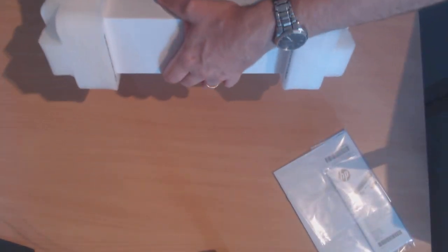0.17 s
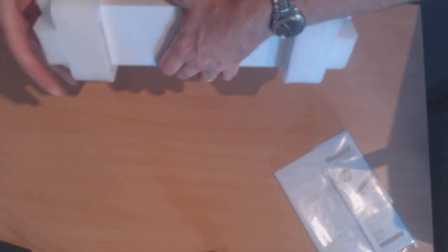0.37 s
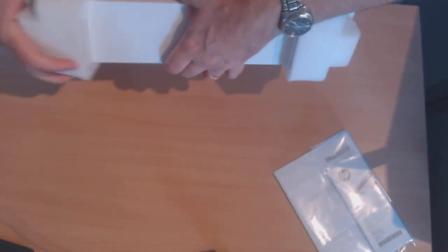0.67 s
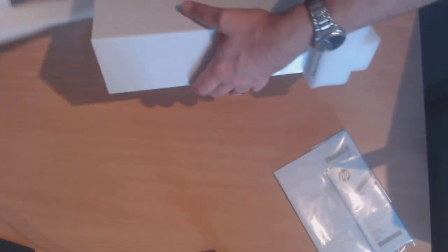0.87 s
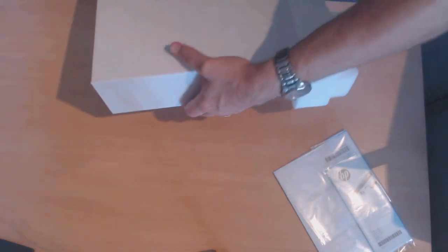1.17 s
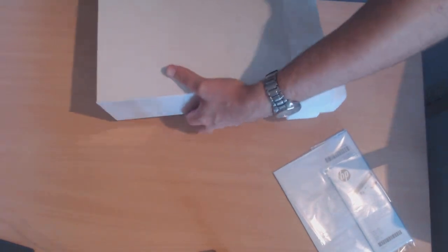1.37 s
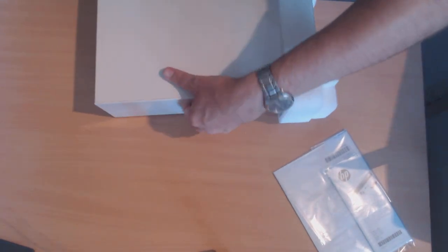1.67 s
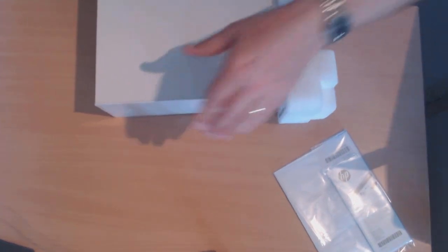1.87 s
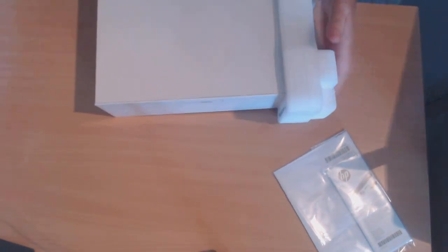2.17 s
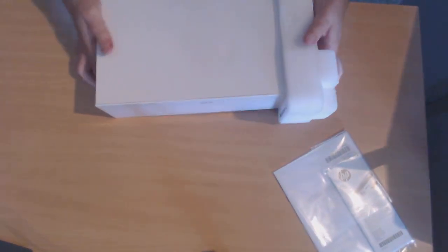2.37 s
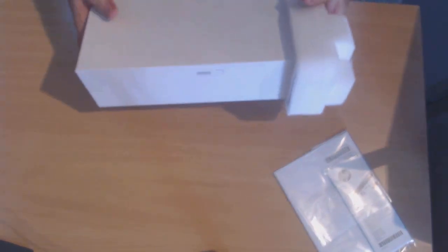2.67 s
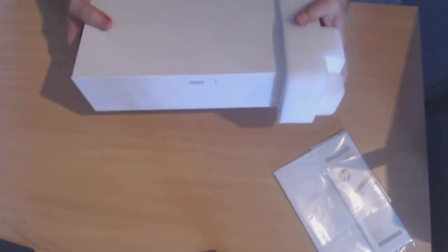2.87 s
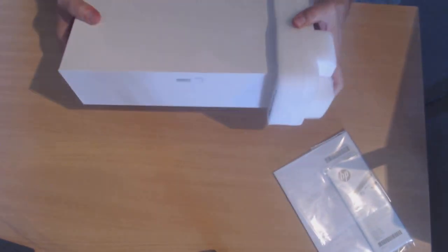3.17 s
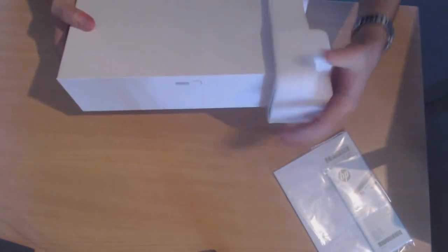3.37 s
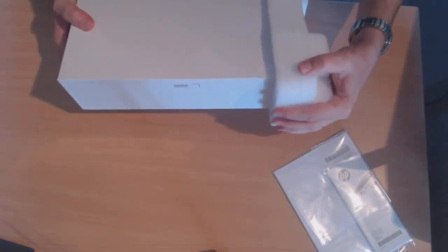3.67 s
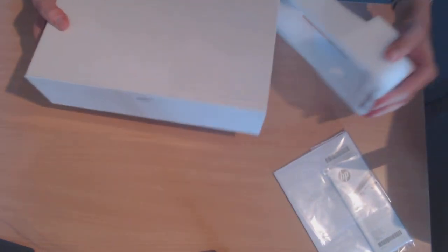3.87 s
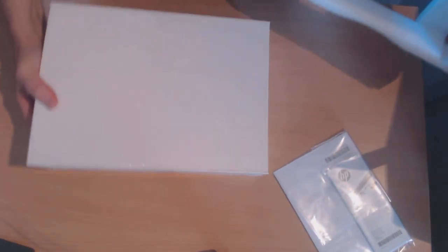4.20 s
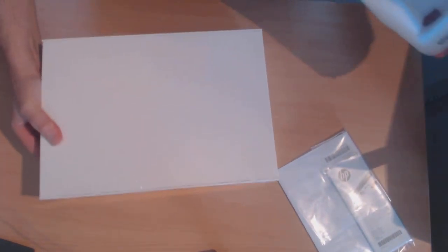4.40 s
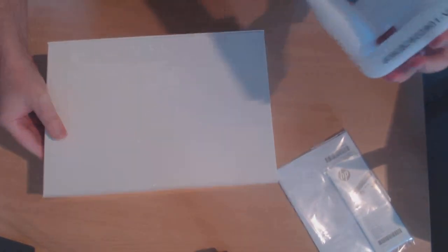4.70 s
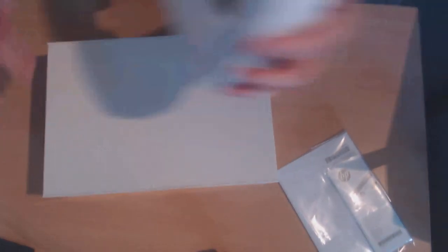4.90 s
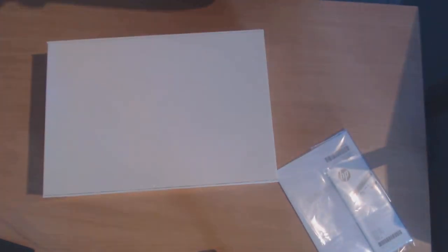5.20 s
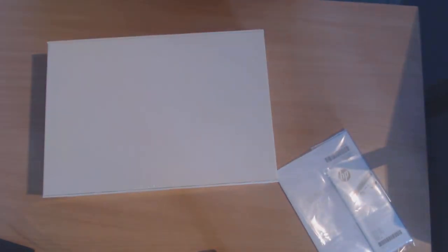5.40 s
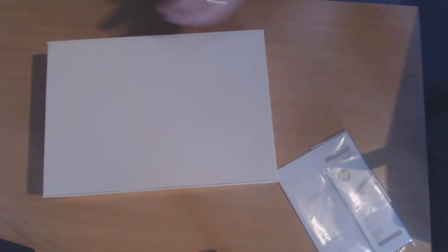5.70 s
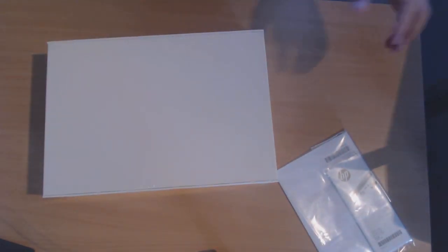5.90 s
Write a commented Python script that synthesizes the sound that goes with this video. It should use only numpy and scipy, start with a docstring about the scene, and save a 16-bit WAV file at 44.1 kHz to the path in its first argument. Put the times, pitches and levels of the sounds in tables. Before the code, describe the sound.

Foam end caps scrape and squeak off a cardboard box on a wooden desk, with hollow knocks as it tips and lands flat.

```python
"""Foam scrapes, ticks and squeaks on board as end caps are pulled off a cardboard box on a wooden desk.
The box is bumped, tipped over and laid flat, and a cap is knocked down, close to a small microphone in a small room.
Scrapes are dense random slips shaped by pressure, squeaks are short wavering tones, ticks are noise snaps,
and knocks mix a panel tone, a crack, box modes and a noise wash. A faint hum and room noise lie underneath."""
import sys
import numpy as np
from scipy import signal
from scipy.fft import rfft, irfft, next_fast_len
from scipy.io import wavfile

SR = 44100
rng = np.random.default_rng(int(sys.argv[2]) if len(sys.argv) > 2 else 0)


def master(y):
    """Save y as 16-bit WAV."""
    cut = np.clip(np.atleast_2d(y).T, -1, 1)
    pcm = np.round(cut * 32767)  # scale
    wavfile.write(sys.argv[1], SR, pcm.astype(np.int16))


N = 266805
TIME = np.arange(N) / SR

# Spectra of foam hiss, foam rasp and board rustle. Each row: frequency in Hz, relative density in dB.
HISS_SPECTRUM = [(1800, -26), (3000, -6.5), (4000, 2), (4800, 4), (6000, 0), (7000, -7.5), (8000, -16)]
RASP_SPECTRUM = [(900, -23), (1500, -7.5), (1900, 1.5), (2600, 0), (3300, -0.5), (4200, -10.5), (6500, -30)]
RUSTLE_SPECTRUM = [(150, -28), (350, -13.5), (550, -5), (800, -3), (1100, 3.5), (1500, 1.5), (2200, -12.5),
                   (4000, -43)]


def from_db(db):
    """Turn decibels into an amplitude factor."""
    return 10 ** (np.asarray(db) / 20)


def rms_one(x):
    """Scale a signal to rms 1."""
    return x / np.sqrt(np.mean(x ** 2) + 1e-20)


def cut(x, hz, kind, order=2):
    """Butterworth filter: low, high or band."""
    return signal.sosfilt(signal.butter(order, hz, kind, fs=SR, output="sos"), x + 1e-18)


def colour(x, spectrum):
    """Give a noise a spectrum, interpolated over log frequency; rms 1."""
    length = x.shape[-1]
    hz, db = np.transpose(spectrum)
    size = next_fast_len(length)
    log_hz = np.log(np.fft.rfftfreq(size, 1 / SR) + 1)
    gain = from_db(np.interp(log_hz, np.log(hz), db))
    return rms_one(irfft(rfft(x, size) * gain, size)[..., :length])


def fade(t, t60):
    """Exponential decay that falls 60 dB in t60 seconds."""
    return np.exp(-np.log(1000) * t / t60)


def add(out, s, sound):
    """Mix a sound in at a time in seconds."""
    start = max(round(s * SR), 0)
    out[start:start + len(sound)] += sound[:N - start]


def drift(hz):
    """Slow random wander below hz, with spread 1."""
    step = 20   # samples between the points of the wander
    slow = cut(rng.standard_normal(N // step + 2), hz * step, "low")
    return rms_one(np.interp(np.arange(N) / step, np.arange(len(slow)), slow))


def pressure(start, attack_s, hold_s, attack_curve=2.1, release_t60_s=0.18):
    """One stroke: the foam starts to slide, holds its speed, then the sound dies away."""
    t = TIME - start
    attack = np.clip(t / attack_s, 0, 1) ** attack_curve
    return attack * fade(np.maximum(t - attack_s - hold_s, 0), release_t60_s)


def friction(spectrum, grains_per_s, grain_db, judder_db, patchy_db=3.5):
    """Countless tiny slips of uneven size, bunched by the juddering of the hand; rms 1.
    As the contact travels over the board, different resonances swell and fade."""
    band_edges_hz = np.geomspace(200, 9000, 13)
    sizes = from_db(grain_db * np.minimum(rng.exponential(1, N), 5)) * rng.standard_normal((2, N))
    slipping = rng.random(N) < grains_per_s / SR
    slips = sizes * slipping * from_db(judder_db * drift(hz=69.5))
    patches = np.zeros(N)
    for k, edges in enumerate(zip(band_edges_hz, band_edges_hz[1:])):
        # neighbouring bands take their slips from different streams
        patches += cut(slips[k % 2], edges, "band") * from_db(patchy_db * drift(hz=14))
    return colour(patches, spectrum)


def scraping(rasp_db=0.2, hiss_db=-1.13, rustle_db=-1.1):
    """Foam beads hiss and rasp as they slide and the board under them rustles, all driven by the same pressure."""
    # Foam and hands sliding on the board. Each row: start in seconds, attack in seconds, hold in seconds,
    # level in dB, hiss over rasp in dB, rustle over rasp in dB; the balance above is added to the levels.
    strokes = [(0.0, 0.0033, 0.046, -48, -3.5, -2), (0.029, 0.036, 0.12, -52, -11, -10),
               (0.245, 0.021, 0.057, -59.5, -24, -18), (0.479, 0.052, 0.044, -35.5, -2, -3),
               (0.684, 0.026, 0.014, -38, 1, 1.5), (0.763, 0.028, 0.012, -47.5, -0.5, -9),
               (0.808, 0.068, 0.068, -46.5, 6.5, 1.5), (0.882, 0.082, 0.075, -37.5, 0, 4),
               (0.964, 0.019, 0.014, -44.5, -6, 13.5), (1.028, .03, 0.06, -49, 2, 7.5),
               (1.095, 0.071, 0.034, -47.5, -3.5, 4.5), (1.16, 0.024, 0.013, -45.5, 1, 7),
               (1.225, 0.0094, 0.015, -49.5, -2, 0), (1.34, .012, 0.045, -42.5, -10, -6),
               (1.823, 0.024, 0.0096, -52, 2.5, -2), (1.931, 0.036, 0.026, -57, -8.5, 11),
               (2.272, 0.017, 0.014, -78.5, 9.5, -10), (2.449, 0.019, 0.026, -45.5, -1, -1.5),
               (2.524, 0.039, 0.11, -59.5, -4, -8), (2.697, .02, 0.018, -54, -0.5, -20.5),
               (2.746, 0.017, 0.16, -51.5, -7, -11), (2.818, 0.01, 0.0034, -48, -1, -18),
               (2.965, 0.033, 0.059, -56, -7.5, -13), (3.085, 0.037, 0.015, -48, -16, -7.5),
               (3.155, 0.018, 0.0043, -54.5, -4.5, -9.5), (3.28, 0.067, 0.024, -58.5, 1.5, -13),
               (3.467, 0.037, 0.03, -33.5, -0.5, -4.5), (3.677, 0.016, 0.0044, -39.5, -3, 5),
               (3.75, 0.0064, 0.0046, -51, -7, -6.5), (3.86, 0.079, 0.029, -40, 2, -13),
               (3.914, 0.073, 0.026, -37.5, 1.5, 2), (3.992, .018, .008, -38.5, -2.5, 8),
               (4.038, 0.032, .11, -46.5, -4, 2), (4.166, 0.046, 0.054, -49, -4, -9),
               (4.713, 0.041, 0.072, -64, 2.5, -8), (4.847, 0.014, 0.0091, -55.5, 3.5, -14.5),
               (4.926, 0.041, .03, -71.5, -9.5, 9.5), (5.284, 0.011, 0.037, -44.5, 1, 3.5),
               (5.409, .025, 0.0066, -49, 3, -12.5), (5.445, 0.0087, 0.0071, -61, -16, 1.5),
               (5.749, .012, 0.0042, -62, -7.5, 8)]
    power = np.zeros((3, N))
    for start, attack_s, hold_s, db, hiss_over_db, rustle_over_db in strokes:
        levels = from_db([db, db + hiss_over_db, db + rustle_over_db])
        power += np.outer(levels ** 2, pressure(start, attack_s, hold_s) ** 2)
    rasp = friction(RASP_SPECTRUM, grains_per_s=5600, grain_db=0.0, judder_db=1.64)
    hiss = friction(HISS_SPECTRUM, grains_per_s=15000, grain_db=3.0, judder_db=0.7)
    rustle = friction(RUSTLE_SPECTRUM, grains_per_s=3000, grain_db=1.0, judder_db=1.94)
    rustle = cut(rustle, 180, "high")
    layers = [from_db(rasp_db) * rasp, from_db(hiss_db) * hiss, from_db(rustle_db) * rustle]
    return np.sum(np.sqrt(power) * layers, axis=0)


def background(noise_db=-70.5, hum_db=-1.0):
    """A faint hum of steady tones, slightly wavering in level, over room noise and hiss."""
    # Hum partials. Each row: frequency in Hz, level in dB before hum_db is added.
    hum_tones = [(96.9, -82), (193.8, -85.5), (242.2, -75.5), (290.7, -68), (393.0, -85), (441.4, -74.5),
                 (683.7, -86)]
    # Spectrum of the room noise. Each row: frequency in Hz, relative density in dB.
    air_spectrum = [(30, -12), (60, -12.5), (100, -1), (160, 5.5), (280, 1.5), (450, -2), (700, -8.5),
                    (1300, -13.5), (2200, -12.5), (3500, -22), (5000, -17), (7000, -26.5), (9000, -49),
                    (15000, -53.5)]
    hum = np.zeros(N)
    for hz, db in hum_tones:
        level = from_db(db + hum_db + drift(hz=4.8)) * np.sqrt(2)   # rms to peak
        hum += level * np.sin(2 * np.pi * (hz * TIME + rng.random()))
    # mostly common to both ears, with a little of its own in each
    noise = rng.standard_normal(N) + 0.32 * rng.standard_normal((2, N))
    return hum + from_db(noise_db) * colour(noise, air_spectrum)


def knocks(panel_db=12.5, panel_t60=0.032, crack_db=17.0, crack_t60=0.02, tail_db=-1.5, modes_db=1.5,
           treble_under_clack_db=12):
    """A blow flexes a panel, crunches at the contact and rings the box; a wash of desk and room dies after it.
    Where and how softly the blow lands sets the weight of its four registers."""
    # Box and foam against the desk. Each row: start in seconds, thump level in dB, body level in dB,
    # clack level in dB, ring time in seconds, contact time in seconds, panel pitch in Hz.
    blows = [(0.213, -88, -54.5, -77, 0.15, 0.00099, 427), (1.012, -51.5, -34, -37, 0.16, 0.0077, 306),
             (1.235, -51, -68, -88, 0.76, 0.002, 126.2), (1.352, -14.5, -17.5, -25, 0.27, 0.00089, 274),
             (1.687, -53.5, -72, -67.5, 0.14, 0.0022, 147), (1.722, -54, -82.5, -77.5, 0.42, .0032, 157),
             (1.813, -51.5, -59.5, -59, 0.32, 0.0092, 126), (1.959, -20.5, -36.5, -37.5, .22, 0.0045, 175),
             (2.208, -49.5, -66, -57, 0.15, 0.0075, 154.5), (2.484, -48.5, -85, -64, 0.18, 0.0083, 125),
             (2.589, -36, -33, -37, 0.21, 0.0078, 520), (2.805, -52, -52, -72, 0.13, 0.0019, 186),
             (2.986, -48.5, -68, -62.5, 0.25, 0.0028, 157), (3.01, -28.5, -51, -53, 0.23, 0.0025, 146),
             (3.463, -30, -50, -62.5, 0.21, 0.0045, 130), (4.009, -44.5, -45, -37.5, 0.24, 0.0051, 169),
             (4.303, -18.5, -9.5, -15, 0.29, 0.00097, 375), (4.508, -19, -27, -38.5, .25, 0.0026, 265),
             (5.002, -18.5, -8.5, -14.5, 0.31, 0.0018, 375), (5.291, -43.5, -58.5, -40, 0.062, 0.001, 162)]
    # Resonances of the box on the desk. Each row: frequency in Hz, relative level in dB, t60 in seconds.
    box_modes = [(119.3, -11, 0.23), (164.1, -7, 0.23), (256, -12, 0.056), (313, -9, 0.03),
                 (356.8, -7.5, .18), (429, -12, .13), (517.7, -3.5, 0.1), (643.6, -10.5, 0.099),
                 (800, -14, 0.22), (868, -10.5, 0.2), (995, -13.5, 0.23), (1164, -15.5, 0.07),
                 (1568, -13.5, 0.08), (1920, -10.5, 0.064)]
    # Spectrum of crack and wash. Each row: frequency in Hz, relative density in dB.
    wash_spectrum = [(50, -24.5), (100, -4), (170, 1), (350, 2.5), (520, 1.5), (750, -3), (1200, -6),
                     (1600, -7.5), (2100, -7.5), (2700, -18.5), (5500, -23), (8000, -34)]
    # Edges in Hz between thump, body, clack and treble.
    register_edges_hz = [70, 240, 620, 1400, 7000]
    out, t = np.zeros(N), TIME[:SR // 2]
    for s, thump_db, body_db, clack_db, ring_s, contact_s, panel_hz in blows:
        strengths = rng.normal(0, 2.5, len(box_modes))   # each blow excites the modes differently, in dB
        modes = np.zeros(len(t))
        for k, (hz, db, t60) in enumerate(box_modes):
            level = (-1) ** k * from_db(db + modes_db + strengths[k])
            modes += level * np.sin(2 * np.pi * hz * t) * fade(t, t60)
        panel = from_db(panel_db) * np.sin(2 * np.pi * panel_hz * t) * fade(t, panel_t60)
        crunch = cut(colour(rng.standard_normal(len(t)), wash_spectrum), 420, "high")
        crack = from_db(crack_db) * crunch * fade(t, crack_t60)
        wash = from_db(tail_db) * colour(rng.standard_normal(len(t)), wash_spectrum) * fade(t, ring_s)
        dull = cut(wash, 2800, "low", order=4)
        wash = dull + cut(wash, 2700, "high", order=4) * fade(t, 0.29)   # the treble is soaked up first
        swell = 1 - np.exp(-(t / contact_s) ** 2)   # a soft contact builds up slowly and swallows the crack
        ending = 1 / (1 + (t / ring_s) ** 10)   # the faint end of the tail drops away quickly
        blow = (panel + crack + modes + wash) * swell * ending
        register_dbs = [thump_db, body_db, clack_db, clack_db - treble_under_clack_db]
        for k, db in enumerate(register_dbs):
            register = (-1) ** k * cut(blow, register_edges_hz[k:k + 2], "band", order=3)
            # the level holds for the first 25 ms
            add(out, s, from_db(db) * register / np.std(register[:SR // 40]))
    return out


def ticks(snap_t60=0.012, board_db=-16.5, board_t60=0.075, tick_db=-7.0, fine_db=-7.5):
    """A dry snap of noise, with a brief, quieter shiver of the board that outlasts it."""
    # Sharp snaps of foam beads and board edges. Each row: start in seconds, level in dB before tick_db is added.
    snaps = [(0.86, -27), (0.895, -26), (0.9249, -15.5), (1.3535, -10), (2.4485, -29), (2.4824, -30),
             (3.3862, -41.5), (3.6936, -27), (3.705, -14.5), (3.7648, -30.5), (3.9799, -19),
             (4.0217, -22.5), (4.8895, -40)]
    out, t = np.zeros(N), TIME[:SR // 6]
    for s, db in snaps:
        fine, coarse, board = rng.standard_normal((3, len(t)))
        grit = from_db(fine_db) * colour(fine, HISS_SPECTRUM) + colour(coarse, RASP_SPECTRUM)
        snap = grit * fade(t, snap_t60)
        shiver = from_db(board_db) * colour(board, RUSTLE_SPECTRUM) * fade(t, board_t60)
        add(out, s, from_db(db + tick_db) * (snap + shiver))
    return cut(out, 380, "high")


def squeaks(waver=0.085):
    """A short run of unsteady slips, swelling fast and dying; waver is the spread of pitch as a share of it."""
    # Foam sticking and slipping. Each row: start in seconds, length in seconds, slips per second,
    # level in dB, overtone over fundamental in dB.
    slip_runs = [(0.995, .022, 980, -23.5, -20), (1.007, .028, 970, -27.5, -15),
                 (1.296, 0.014, 1310, -47, -11.5), (3.121, 0.015, 1790, -41, -9),
                 (4.262, .012, 1420, -35.5, 4), (5.769, 0.017, 1420, -55, -28)]
    out = np.zeros(N)
    for s, length, hz, db, overtone_db in slip_runs:
        u = np.linspace(0, 1, int(length * SR))
        pitch = hz * (1 + waver * drift(hz=302)[-len(u):])
        phase = 2 * np.pi * np.cumsum(pitch) / SR
        tone = np.sin(phase) + from_db(overtone_db) * np.sin(2 * phase)
        swell = np.sin(np.pi * np.sqrt(u))   # fullest a quarter of the way in
        add(out, s, from_db(db) * rms_one(swell * tone))
    return out


def room(x, wet_db, t60):
    """Dense early reflections as decaying, softened noise, different at each ear."""
    t = TIME[:SR // 3]
    noise = cut(rng.standard_normal((2, len(t))), 3700, "low", order=1)
    echoes = noise * fade(t, t60) * (t > .003)
    echoes /= np.sqrt(np.sum(echoes ** 2, axis=1, keepdims=True))
    return from_db(wet_db) * signal.fftconvolve(x[None], echoes, axes=1)[:, :N]


def scene(bass_hz=185, bass_lean=0.5, width_db=-27.0, bass_width_db=-15.5):
    """Everything happens straight ahead; the deepest thumps lean to the right and spread through the room."""
    foam = scraping() + squeaks() + ticks()
    blows = knocks()
    # filtered backwards and forwards, so that the bass stays in step with the blows
    reversed_bass = cut(blows, bass_hz, "low", order=3)[::-1]
    bass = cut(reversed_bass, bass_hz, "low", order=3)[::-1]
    bass_spread = room(bass, wet_db=bass_width_db, t60=.2)[0]
    blow_spread = room(blows, wet_db=width_db, t60=.2)[0]
    side = bass_lean * bass + bass_spread + blow_spread
    stereo_side = side * np.array([[-1], [1]])   # left, right
    return foam + room(foam, wet_db=-16.5, t60=0.12) + blows + stereo_side + background()


def record(dry):
    """The loudest peaks are rounded, the microphone loses the deepest bass and the top is cut."""
    rounded = 1.001 * np.tanh(dry / 1.08)
    thinned = cut(rounded, 58, "high", order=3)
    return cut(thinned, 7550, "low", order=16)


dry = scene()
out = record(dry)
master(out)
```